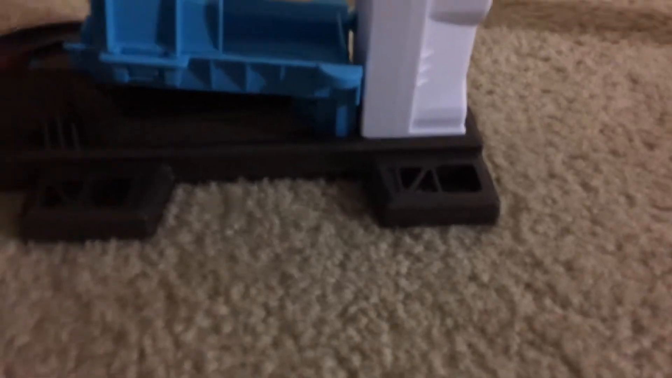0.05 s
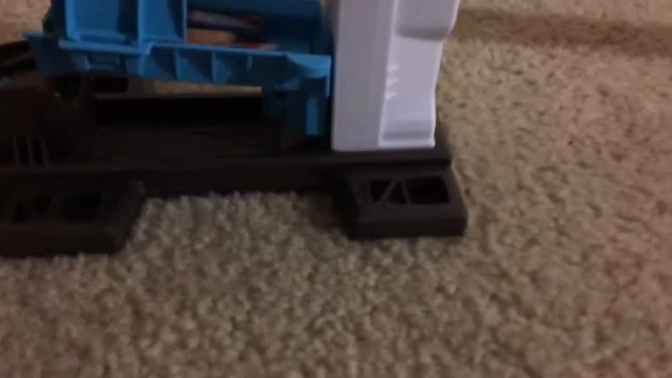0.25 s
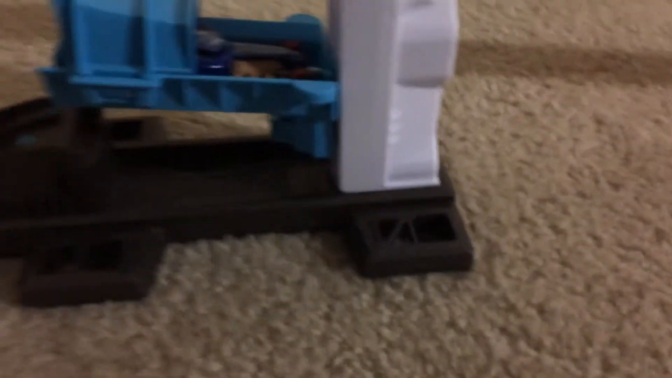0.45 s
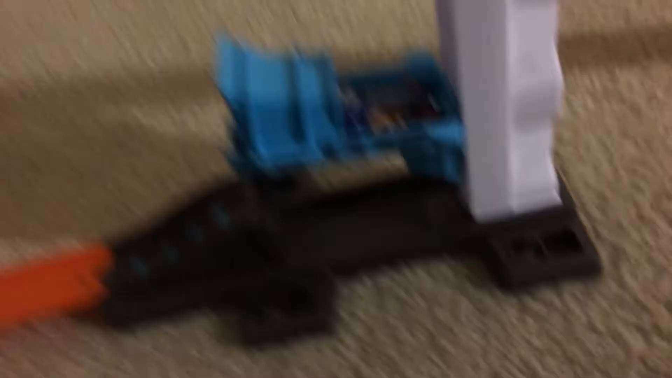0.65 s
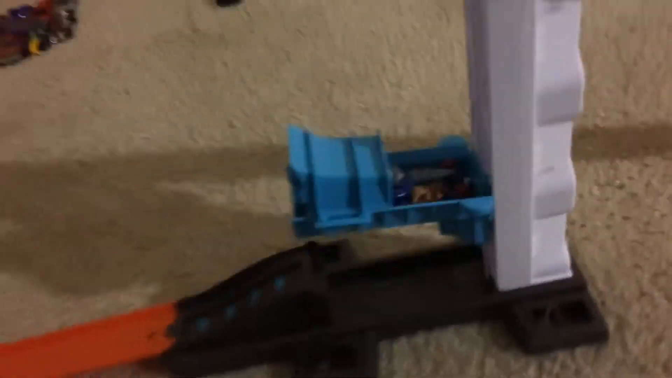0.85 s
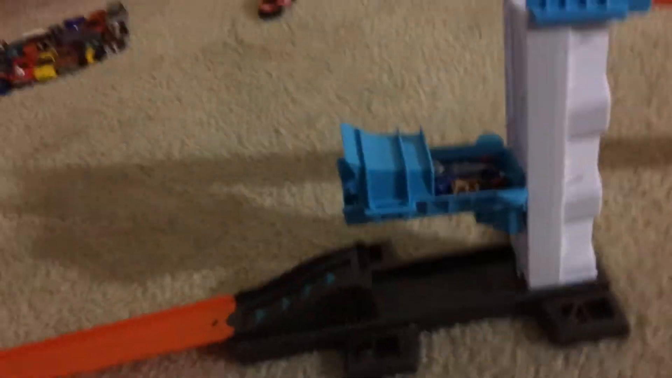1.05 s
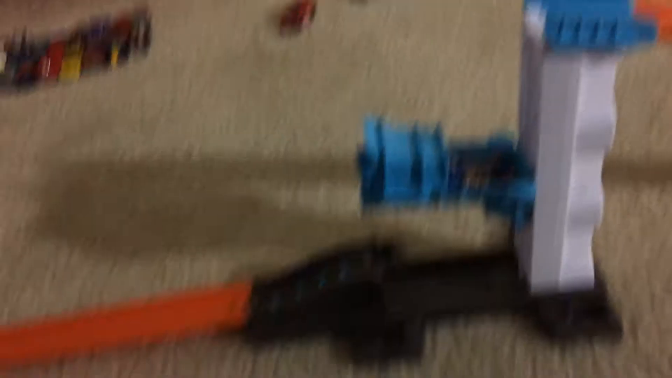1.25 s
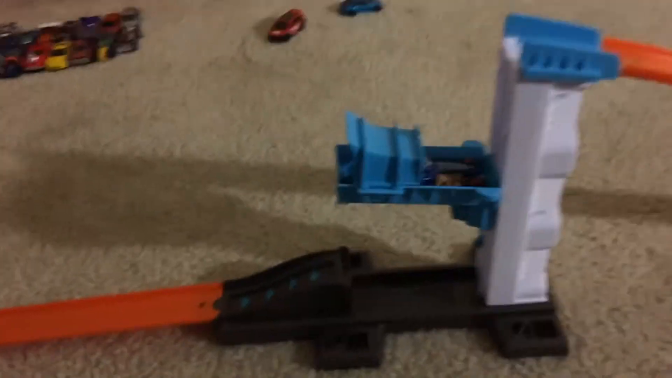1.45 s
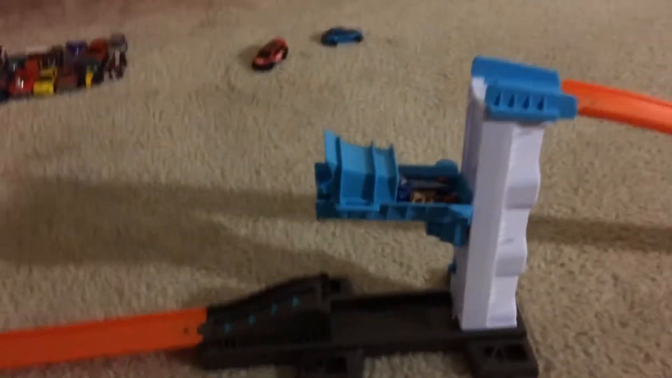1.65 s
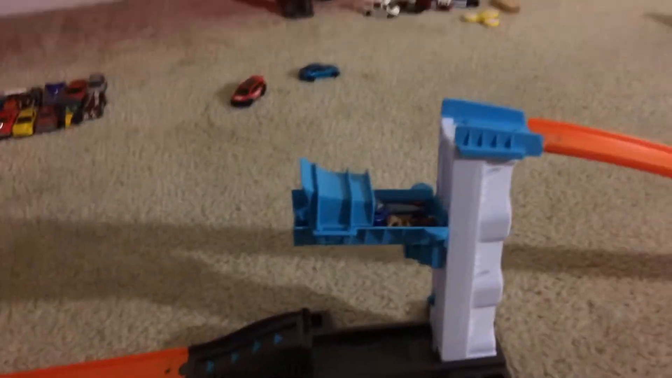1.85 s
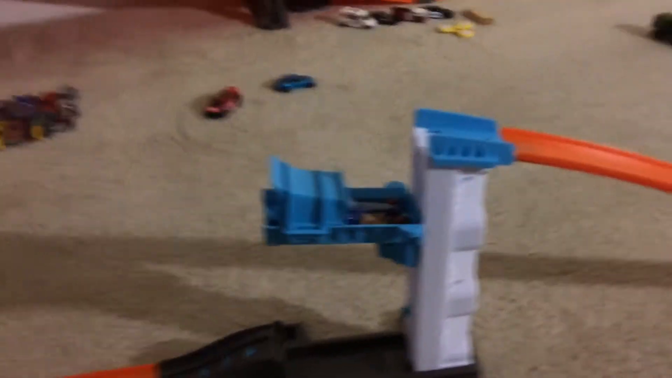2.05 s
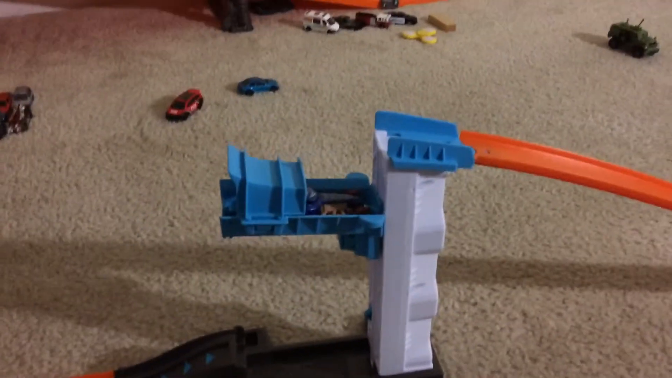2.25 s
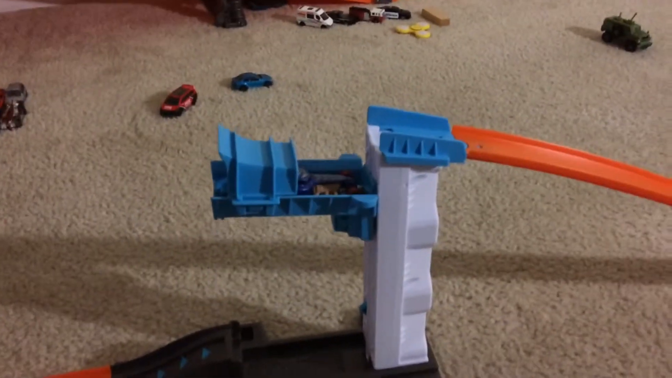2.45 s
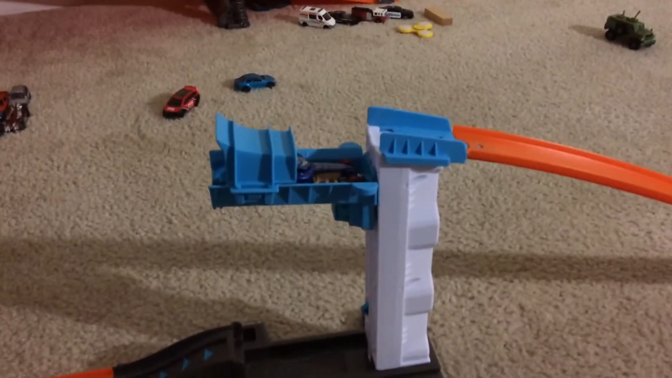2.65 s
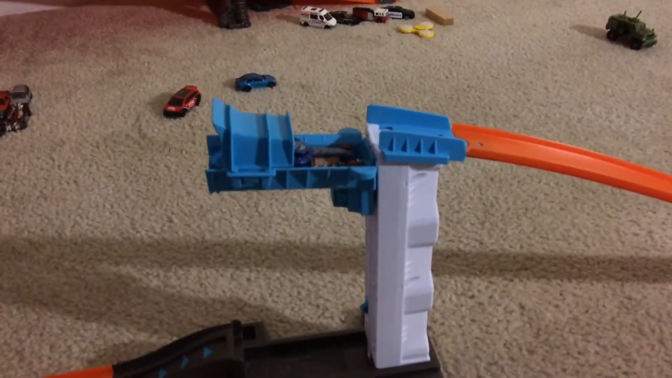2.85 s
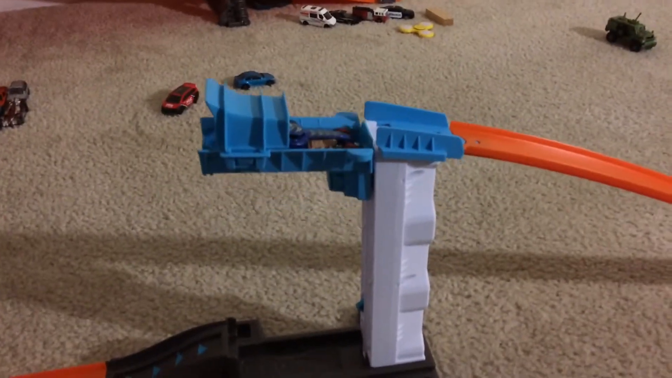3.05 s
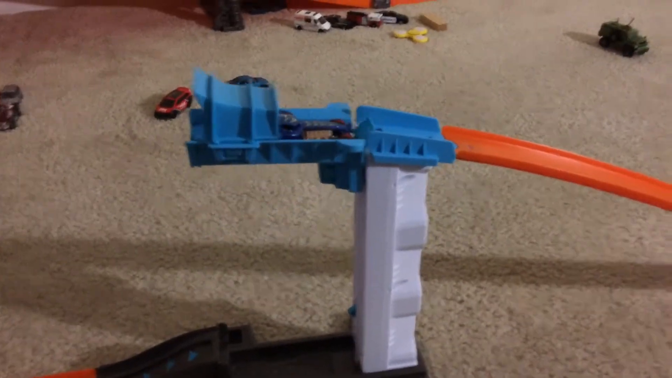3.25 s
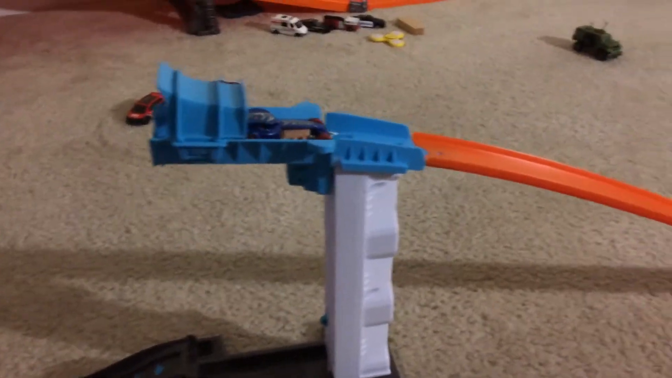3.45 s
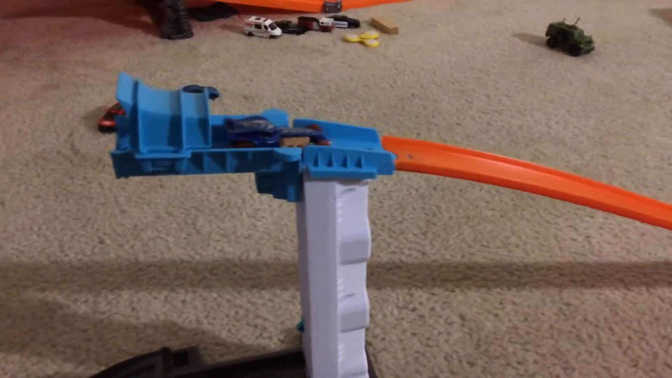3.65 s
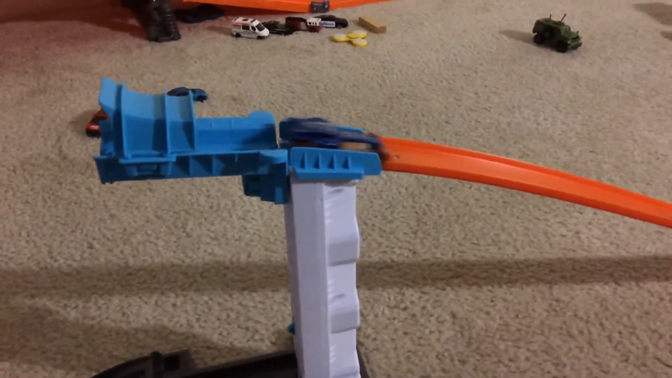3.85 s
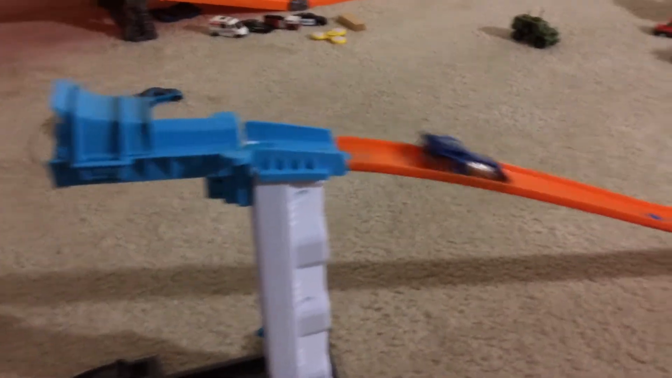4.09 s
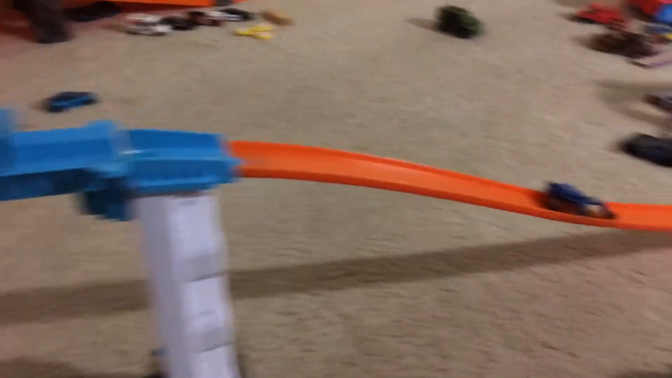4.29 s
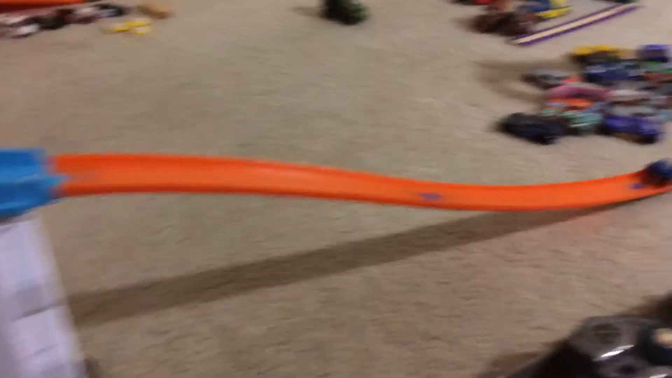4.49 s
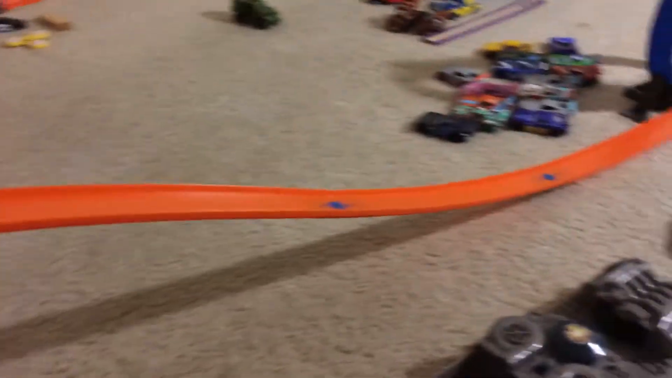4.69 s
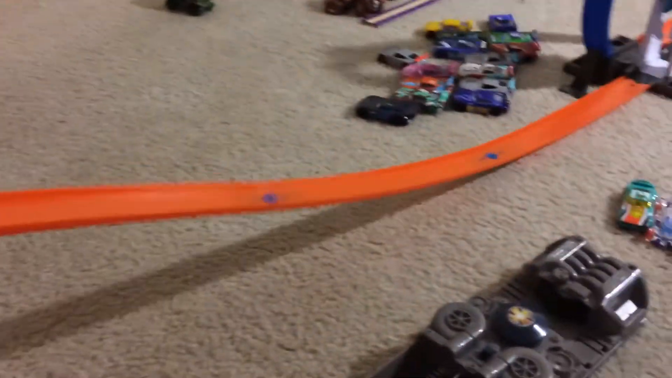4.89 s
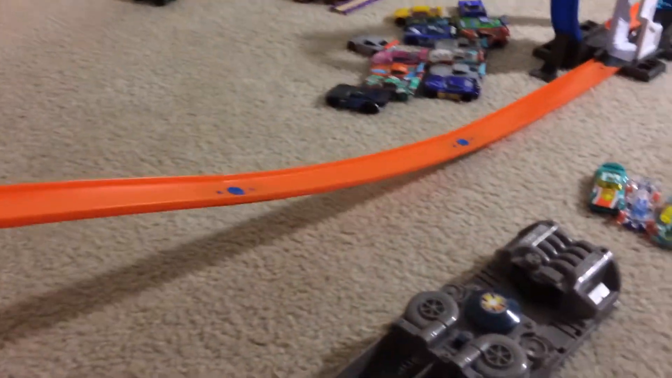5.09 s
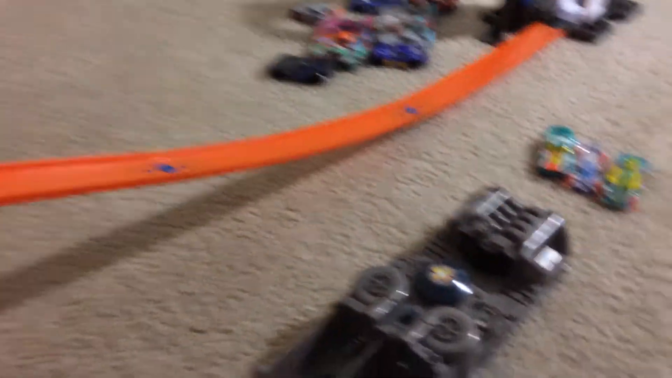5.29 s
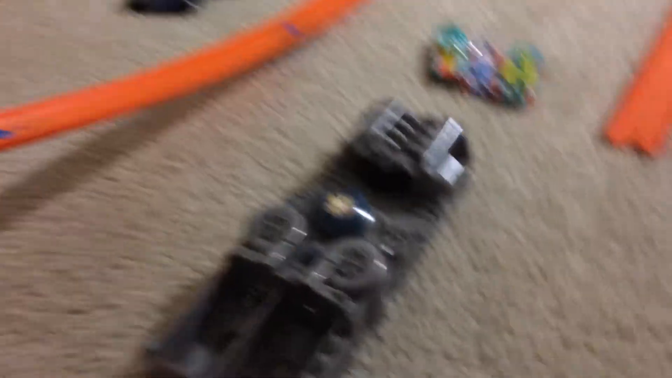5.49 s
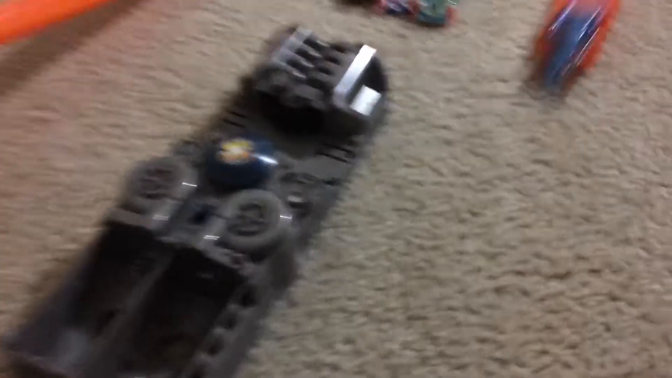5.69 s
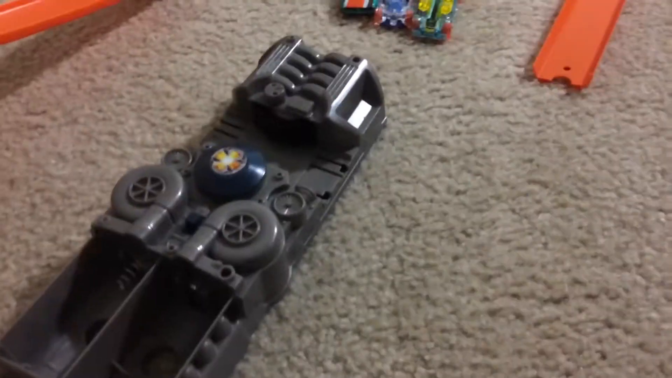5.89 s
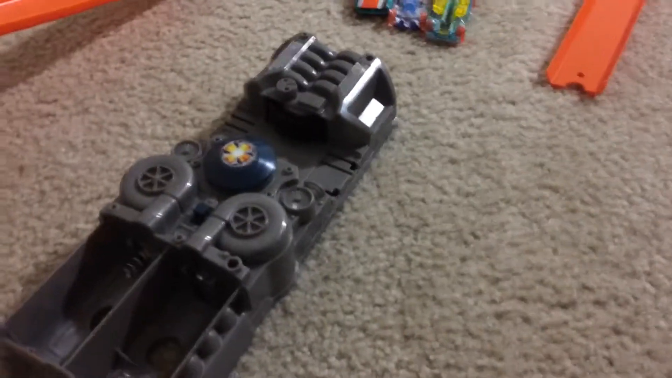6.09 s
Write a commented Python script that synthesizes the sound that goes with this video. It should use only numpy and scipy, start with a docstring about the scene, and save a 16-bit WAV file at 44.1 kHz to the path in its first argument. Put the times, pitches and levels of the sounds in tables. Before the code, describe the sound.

Close up in a carpeted room, small wheels rumble and knock on hollow plastic, and a spring-driven lift trips with a dense clatter. Its thin, bright gear whirr runs about three seconds and stops short. A die-cast car clicks out, rolls hissing down plastic track, gets louder, snaps through a booster further off, rattles round bends and returns near the microphone, fading on carpet.

```python
"""Over faint room noise, wheels rumble on a hollow base and knock; then a spring-driven toy lift trips,
clattering, and whirrs up its tower: struck modes ring, and dense gear contacts excite a housing.
The whirr stops; a die-cast car tips out and rolls down the track as random bumps ringing walls and chassis.
It sets off a snapping booster, rattles round far curves and coasts back close by in a carpeted room."""
import sys
import numpy as np
from scipy import signal
from scipy.fft import rfft, irfft
from scipy.io import wavfile

SR = 44100
rng = np.random.default_rng(int(sys.argv[2]) if len(sys.argv) > 2 else 0)


def inscribe(sig):
    """Save sig as 16-bit PCM at rate SR to the path in sys.argv[1].

    A 1-D sig is mono; a 2-D sig holds one channel per row.
    Samples are clipped to [-1, 1] before scaling.
    """
    pcm = np.round(np.clip(np.atleast_2d(sig).T, -1, 1) * 32767)
    wavfile.write(sys.argv[1], SR, pcm.astype(np.int16))


N = 270244
TIME = np.arange(N) / SR   # s

# spectrum of knocks of the car and rattle of its axles: f/Hz, relative density level/dB
TICK_COLOUR = [(150, -29), (250, -16), (746, -25), (903, 0), (1690, 4.5), (2470, 6.5), (3810, 10),
               (6410, -4.5), (8910, -11.5), (10400, -13), (15800, -25)]


def from_db(db):
    """Level to amplitude: 20 dB is a factor of ten."""
    return np.exp(np.asarray(db) * (np.log(10) / 20))


def rms_one(x):
    """Normalization to unit effective value."""
    return x / np.sqrt(np.mean(x ** 2) + 1e-20)


def in_time(rows):
    """Linear interpolation of each column of a curve at every sample."""
    s, *columns = np.transpose(rows)
    return [np.interp(TIME, s, c) for c in columns]


def at_hz(points, hz):
    """Interpolation on a logarithmic frequency axis."""
    table_hz, values = np.array(points).T
    return np.interp(np.log(hz + 1), np.log(table_hz), values)


def band(x, low_hz, high_hz, order=3):
    """Butterworth band-pass: a maximally flat passband."""
    edges_hz = [low_hz, min(high_hz, SR / 2 - 500)]
    return signal.sosfilt(signal.butter(order, edges_hz, "band", fs=SR, output="sos"), x + 1e-18)


def drift(rate):
    """Slow random modulation: Gaussian knots, rate per second, joined by straight lines."""
    knots = rng.standard_normal(2000)
    return np.interp(TIME * rate, np.arange(len(knots)), knots)


def ramp(start_s, length_s):
    """Linear envelope: an even rise from 0 to 1."""
    return np.clip((TIME - start_s) / max(length_s, 1 / SR), 0, 1)


def hump(middle_s, length_s):
    """Sine-squared envelope: a smooth swell from 0 to 1 and back."""
    return np.sin(np.pi * ramp(middle_s - length_s / 2, length_s)) ** 2


def swell(top_s, rise_s, fall_s):
    """Asymmetric sine-squared envelope: separate rise and fall times."""
    return np.sin(np.pi / 2 * (ramp(top_s - rise_s, rise_s) + ramp(top_s, fall_s))) ** 2


def dying(start_s, t60):
    """Exponential decay: holds at 1, then falls 60 dB in t60 seconds."""
    return from_db(-60 * np.maximum(TIME - start_s, 0) / t60)


def colour(x, spectrum, size=4096):
    """Minimum-phase filtering: a causal response with the given spectrum shape and unit power gain."""
    hz = np.arange(size // 2 + 1) * SR / size
    cepstrum = irfft(np.log(from_db(at_hz(spectrum, hz))))
    # folding the cepstrum onto positive time makes the response causal
    cepstrum[1:size // 2] *= 2
    cepstrum[size // 2 + 1:] = 0
    response = irfft(np.exp(rfft(cepstrum)))
    return signal.oaconvolve(x, response / np.linalg.norm(response))[:len(x)]


def resonance(x, hz, width_hz):
    """Damped oscillator: a two-pole resonance with gain 1 on top."""
    r = np.exp(-np.pi * width_hz / SR)
    numerator = np.array([1, 0, -1]) * (1 - r * r) / 2
    denominator = [1, -2 * r * np.cos(2 * np.pi * hz / SR), r * r]
    return signal.lfilter(numerator, denominator, x)


def contacts(per_s, spread_db):
    """Random impact process: independent tiny impacts of uneven size and either sign."""
    size_db = spread_db * np.minimum(rng.exponential(1, N), 4)
    sizes = from_db(size_db) * rng.choice([-1, 1], N)
    return rms_one(sizes * (rng.random(N) < per_s / SR))


def shaken(strength, hz, width_hz):
    """Randomly driven narrow resonance: a carrier in two quadratures, each modulated by slow noise."""
    out, on = np.zeros(N), strength > 0
    noise = rng.standard_normal((2, N), dtype=np.float32)[:, on]
    wobble = signal.sosfilt(signal.butter(2, width_hz / 2, fs=SR, output="sos"), noise)
    pitch_hz = np.broadcast_to(hz, N)   # may move
    phase = 2 * np.pi * np.cumsum(pitch_hz[on]) / SR
    out[on] = strength[on] * rms_one(wobble[0] * np.cos(phase) + wobble[1] * np.sin(phase))
    return out


def rattle(per_s, t60, spectrum):
    """Repeated impact of loose parts: each random touch is a short decaying burst of noise."""
    touches = np.abs(contacts(per_s, spread_db=8.0)) + 1e-18
    envelope = signal.lfilter([1], [1, -from_db(-60 / (t60 * SR))], touches)
    return rms_one(colour(envelope * rng.standard_normal(N), spectrum))


def knocks(rows, spectrum, crack_db, yield_s, size=8192):
    """Modal response to a blow: a brief crack, then a crowd of fast-dying modes coloured by the place hit."""
    out, t = np.zeros(N + size), TIME[:size]
    bands_hz = (40, 1500), (1500, 7000), (7000, 17000)
    for s, level_db, bass_db, treble_db, t60 in rows:
        ring = colour(rng.standard_normal(2 * size), spectrum)
        bass, body, treble = [rms_one(band(ring, *edges)[size:]) for edges in bands_hz]
        tail = from_db(level_db - 60 * t / max(t60, .003))
        crack = from_db(level_db + crack_db - 60 * t / 0.0036)
        blow = from_db(bass_db) * bass * tail
        blow += (body + from_db(treble_db) * treble) * (tail + crack)
        at = max(round(s * SR), 0)
        out[at:at + size] += blow * (1 - np.exp(-t / yield_s))   # soft plastic yields for an instant
    return out[:N]


def room(x, wet_db):
    """Diffuse reverberation: reflections build up within milliseconds and decay at a rate set by frequency."""
    # reverberation time of the room: f/Hz, t60/s
    room_t60 = [(150, 0.54), (530, 0.19), (1400, 0.43), (3700, 0.39), (9700, 0.35), (15000, 0.27)]
    t, tail = TIME[:SR * 3 // 4], 0
    edges = np.geomspace(60, 17000, 9)   # Hz
    for low, high in zip(edges, edges[1:]):
        decay = from_db(-60 * t / at_hz(room_t60, np.sqrt(low * high)))
        tail = tail + band(rng.standard_normal(len(t)), low, high) * decay
    tail = tail * (1 - np.exp(-(t / 0.0036) ** 2))
    return x + from_db(wet_db) * signal.oaconvolve(x, tail / np.linalg.norm(tail))[:N]


def background():
    """Stationary noise: a broad floor and a low hum, both filtered random noise."""
    # spectrum of the floor: f/Hz, relative density level/dB
    floor_colour = [(25, 0.5), (154, 18), (709, -23), (978, 0.5), (1910, -9), (2070, 7.5), (3830, 7),
                    (5420, -27), (10000, -28), (12400, -26), (15000, -63)]
    # spectrum of the low hum: f/Hz, relative density level/dB
    hum_colour = [(22, -24), (36, -6), (64, 6), (86, 4.5), (119, -6), (149, 4), (173, -4), (414, -8.5),
                  (810, -12), (1360, -120)]
    floor = from_db(-61.5) * colour(rng.standard_normal(N), floor_colour)
    return floor + from_db(-62) * colour(rng.standard_normal(N), hum_colour)


def wheels():
    """Roughness excitation: bumps ring thin track walls and the chassis, louder with speed and in bends."""
    # speed of the car: t/s, ratio to its speed at the foot of the ramp
    speed_curve = [(3.66, 0.16), (3.82, 0.075), (4.47, 0.76), (4.75, 1.02), (4.85, 1.17), (5.45, 1.78),
                   (5.55, 0.6), (5.77, 0.75), (5.85, 0.15), (5.94, 0.17), (6.12, 0.053)]
    # spectrum of rolling: f/Hz, relative density level/dB
    roll_colour = [(110, -18), (160, -3), (250, -12), (450, -7), (700, -11), (950, -8), (1600, -3),
                   (2900, 1.5), (4050, 2), (4600, -2.5), (7000, -8), (12600, -18.5), (15800, -31)]
    # track and chassis resonances: f/Hz, width/Hz, relative level/dB
    track_modes = [(880, 28, -19), (1404, 300, -27), (1920, 180, -9), (5800, 220, -6)]
    # chassis modes ringing at the run-out: f/Hz, width/Hz, relative level/dB
    chassis_modes = [(2500, 160, -3), (3850, 600, -1), (8950, 450, -5)]
    # the car rubs the hollow side walls: strongest t/s, length/s, f/Hz, width/Hz, relative level/dB
    scrapes = [(5.05, .22, 998, 260, -10.5), (5.225, .08, 2050, 600, -2), (5.57, 0.35, 2110, 260, -5.5),
               (5.76, .16, 2600, 900, -3.5)]
    # bends press the wheels down and make the track sing:
    # strongest t/s, rise/s, fall/s, extra level/dB, f/Hz, width/Hz, relative resonance level/dB
    bends = [(4.49, .22, 0.36, 1.5, 3350, 900, -1), (5.091, .09, 0.063, 6, 2390, 1480, -1),
             (5.275, 0.0551, 0.19, 4, 2850, 800, 2.5)]

    speed, = in_time(speed_curve)
    released = TIME > speed_curve[0][0]   # until then the car rests in the lift
    near = ramp(5.01, 0.27)   # the car turns back towards the listener
    run_out = ramp(5.8, 0.097)   # the track ends; wheels and chassis ring on
    hollow_db = -5 * ramp(4.26, 0.44)   # the raised, hollow ramp comes down to the carpet
    bass_far_db, bass_near_db, treble_far_db, treble_near_db = -20.5, -14.5, -3.5, 2
    entry_bass_db = 10.5   # the hollow base under the car before release
    bass_db = entry_bass_db * ~released + bass_far_db + (bass_near_db - bass_far_db) * near
    treble_db = treble_far_db + (treble_near_db - treble_far_db) * near

    bumps = contacts(per_s=1600, spread_db=2.0) * from_db(1.7 * drift(rate=140))
    rung = bumps
    for hz, width_hz, mode_db in track_modes:
        rung = rung + from_db(mode_db - 9.0) * resonance(bumps, hz, width_hz)
    rung = room(colour(rung, roll_colour), wet_db=-6.5)
    flex_db = 2.0 * drift(rate=34)   # the track bows under the car and knocks unevenly in its low range
    sound = from_db(2.0) * rms_one(band(rung, 1433, 5330))
    sound += from_db(hollow_db + flex_db) * rms_one(band(rung, 774, 1814))
    sound += from_db(bass_db + flex_db) * rms_one(band(rung, 85, 920))
    sound += from_db(treble_db) * rms_one(band(rung, 4400, 15700))

    for hz, width_hz, mode_db in chassis_modes:
        sound += shaken(run_out * from_db(mode_db + 2.5 * drift(rate=25)), hz, width_hz)
    # the wheels brush the carpet unevenly
    sound += run_out * from_db(-2.5 + 3.3 * drift(rate=47)) * rms_one(band(bumps, 3800, 9200))
    for s, length_s, hz, width_hz, scrape_db in scrapes:
        sound += shaken(from_db(scrape_db) * hump(s, length_s), hz, width_hz)
    grain_db = np.tanh(drift(rate=240))   # the wheels chatter in the bends, within 1 dB
    for s, rise_s, fall_s, extra_db, hz, width_hz, ring_db in bends:
        load = swell(s, rise_s, fall_s)
        singing = shaken(load * from_db(ring_db), hz, width_hz)
        sound = (sound + singing) * from_db((extra_db + grain_db) * load)

    # the car first rolls over the hollow base into the lift
    entry = from_db(-29) * swell(0.069, rise_s=0.1, fall_s=0.012)
    rolling = released * speed * from_db(-37.5)   # amplitude in proportion to speed
    # play in the axles
    axles = from_db(-52) * np.sqrt(np.abs(speed)) * rattle(per_s=290, t60=0.011, spectrum=TICK_COLOUR)
    return sound * (entry + rolling) + released * axles


def car_knocks():
    """Impact of rigid bodies: the car knocks on the carriage and over track joints."""
    # knocks: t/s, relative level/dB, bass/dB, treble/dB, t60/s
    ticks = [(0.054, -21.5, -2, -11, 0.056), (0.0685, -16, -12, -5, 0.034),
             (3.646, -31.5, -6.5, 1.5, 0.048), (3.658, -35, -3.5, -2, 0.015),
             (3.824, -36, -5.5, -14, 0.019), (3.833, -41, 2.5, -20, 0.055), (3.8872, -25.5, -22, -2, 0.01),
             (3.9035, -24.5, -16, -4, 0.023), (3.9073, -12, -11, -5, 0.0091), (3.929, -28, -20, -10, .012),
             (3.946, -24, -20, -7, .012), (3.9615, -20.5, -20, -6, 0.019), (3.986, -26, -16, -16, 0.018),
             (4.048, -34.5, -22, 1, 0.036), (4.0702, -23.5, -3.5, -11, 0.019), (4.074, -28, -4, -12, 0.014),
             (4.1033, -25.5, -7.5, -9, 0.019), (4.111, -28, -14, -11, 0.01), (5.0205, -17, -11, 4, 0.012),
             (5.09, -16, 0, -14, 0.017), (5.194, -22.5, -19, 2, 0.019), (5.2155, -18, -20, 3, .014),
             (5.2592, -12.5, -31, 1, 0.011), (5.298, -13, -26, -3, .011), (5.3832, -12, -28, -4, 0.0086),
             (5.472, -24.5, -23, 6, 0.022), (5.6022, -26.5, -20, 5, 0.011), (5.628, -21.5, -28, 1.5, 0.019),
             (5.878, -30.5, -32, 2, 0.019), (5.94, -34.5, -30, 2.5, 0.021)]
    return room(from_db(-2.5) * knocks(ticks, TICK_COLOUR, crack_db=-16, yield_s=0.00055), wet_db=-9.5)


def latch():
    """Impact excitation: latch, pawl and carriage clack amid a clatter of loose parts and a cavity boom."""
    # latch, pawl and carriage clacks: t/s, relative level/dB, bass/dB, treble/dB, t60/s
    clacks = [(0.0912, -4.5, -16, -1, .009), (0.0975, -13, -4, -9, 0.032), (0.1057, -3.5, -11, -9.5, 0.026),
              (0.1125, -8.5, -11, -11.5, 0.013), (0.1206, -9, 0.5, -5, 0.016), (0.1232, -5, -1.5, 3, 0.019),
              (0.1368, -3, -9, -6, 0.025), (0.1455, -8, -5, 8, 0.0078), (0.154, -6.5, 8, -5, 0.0093),
              (0.1585, -5, -5, -7, 0.023), (0.163, -13.5, 2.5, -1.5, 0.015), (0.170, -8, -0.5, -3, 0.014),
              (0.1835, -7, -11.5, 1, 0.0081), (0.2098, -4, -29, -10, 0.013), (0.2175, -7, -8, -3, 0.023),
              (0.229, -16, -23, -9, 0.0087), (0.2794, -9.5, -11, -2, 0.016),
              (0.3635, -9.5, -13, 0.5, 0.021), (0.3665, -4.5, -39, 2.5, 0.011)]
    # spectrum of clacks and clatter: f/Hz, relative density level/dB
    clack_colour = [(45, -19), (140, -10.5), (270, -20.5), (370, -1.5), (520, -8), (750, -8.5), (1000, 0),
                    (1700, 6), (3400, 10), (5500, 7), (12700, 3), (15800, -16)]
    clatter = from_db(-21) * hump(0.162, 0.076) * rattle(per_s=240, t60=.012, spectrum=clack_colour)
    # the hollow tower booms under the clatter
    boom = shaken(from_db(-19.5) * hump(.165, 0.054), hz=963, width_hz=280)
    blows = from_db(-1) * knocks(clacks, clack_colour, crack_db=-12.0, yield_s=0.0004)
    return room(blows + clatter + boom, wet_db=-10.0)


def thuds():
    """Free vibration: hollow bodies answer blows with one damped mode each, and a low rumble sounds at 3.41 s."""
    # bodies set ringing by the hardest blows and bumps, and a low rumble at 3.41 s: t/s, relative level/dB,
    # f/Hz, t60/s
    thud_rows = [(0.103, -12, 177, 0.035), (0.122, -22, 80, 0.091), (0.139, -24, 140, 0.045),
                 (.163, -20.5, 352, 0.046), (.167, -16, 967, .045), (0.279, -10.5, 2900, 0.023),
                 (.291, -11.5, 2940, 0.027), (0.3625, -4, 1170, 0.025), (0.3645, -6, 960, 0.021),
                 (0.365, -1.5, 1370, 0.013), (3.659, -24.5, 2040, 0.016), (3.413, -47, 103.7, 0.29),
                 (3.965, -31.5, 1615, 0.071), (3.986, -30, 3820, 0.027), (4.78, -23, 137, 0.036),
                 (5.147, -35.5, 430, 0.056), (5.194, -35, 612, 0.069), (5.216, -32, 560, 0.055),
                 (5.473, -36, 545, 0.072)]
    out, t = np.zeros(N), TIME[:SR // 3]
    for s, level_db, hz, t60 in thud_rows:
        at = round(s * SR)
        envelope = from_db(level_db - 60 * t / t60) * (1 - np.exp(-.8 * t * hz))
        out[at:at + len(t)] += envelope * np.sin(2 * np.pi * hz * t)
    return room(out, wet_db=-13)


LIFT_START_S, LIFT_STOP_S = 0.12, 3.438


def moving_paths(x, count=12):
    """Multipath interference: paths from many housing faces lengthen, so bands wander and glide down."""
    share, stretch_per_s = .18, .06   # strength of each path, and its fractional lengthening per second
    lags_s = rng.uniform(.0005, .0034, count)
    oversampling = 4   # allows fine delay steps
    fine, index = signal.resample_poly(x, oversampling, 1), np.arange(N) * oversampling
    out = x
    for lag_s in lags_s:
        lag = (lag_s * (1 + stretch_per_s * TIME) * SR * oversampling).astype(int)
        out = out + share * drift(rate=10) * fine[index - lag]
    return out


def moving_high_pass(x, edge_hz, size=2048):
    """Radiation cutoff: a steep high-pass whose edge follows a curve block by block."""
    out, state = np.zeros(N), np.zeros((5, 2))
    for i in range(0, N, size):
        sos = signal.butter(10, edge_hz[i], "high", fs=SR, output="sos")
        out[i:i + size], state = signal.sosfilt(sos, x[i:i + size], zi=state)
    return out


def housing(edge_hz):
    """Modal resonance: some housing modes grow or fade with height, others swell in passing and glide."""
    # modes that ring all through the climb: f/Hz, width/Hz, relative level at mid climb/dB, growth/(dB/s)
    steady_modes = [(1471, 120, -25.5, 4.5), (2950, 320, -31, 12), (7320, 1200, -21, -0.5),
                    (10290, 2200, -7.5, 0), (13900, 1550, -11.5, 0)]
    # the housing sings out as it passes places on the tower:
    # strongest t/s, length/s, f/Hz, glide/(Hz/s), width/Hz, relative level/dB
    passing_modes = [(0.45, 0.8, 1660, -100, 300, -12.5), (0.293, 0.38, 9020, -500, 520, -1),
                     (0.52, .3, 8980, 4, 620, -4), (0.597, 0.5, 6240, 304, 500, -7.5),
                     (.62, 0.6, 2443, 199, 200, -11.5), (.6, 0.7, 4150, -1.5, 180, -6),
                     (0.84, .75, 3950, -800, 350, -6.5), (0.84, .4, 10150, 1215, 660, -8),
                     (0.8, .35, 7280, -300, 350, -12), (1.099, 0.75, 2700, 201.5, 350, -10.5),
                     (1.1, .7, 5880, 699, 340, -14), (1.28, .42, 9250, -300, 190, -9.5),
                     (1.465, .55, 10080, -5, 290, -7.5), (1.481, 0.27, 8130, 388, 450, -5.5),
                     (1.67, .8, 891, 0, 137, -16), (2.02, .7, 3560, -900, 360, -9),
                     (1.85, 1.1, 6300, -300, 370, -10), (2.33, .5, 3850, -300, 160, -11),
                     (2.333, 0.702, 6080, -450, 300, -4.5), (2.349, 0.704, 8850, -1100, 550, -8),
                     (2.45, 1.5, 3390, -29.5, 120, -13), (2.55, .7, 10340, 5, 430, -10.5),
                     (3.08, .75, 3850, -300, 170, -8), (3.205, 0.6, 2064, -150, 167, -12),
                     (4.5, 0.43, 9300, -200, 350, -9)]
    climb_s = TIME - (LIFT_START_S + LIFT_STOP_S) / 2
    running = 1 - ramp(LIFT_STOP_S, 0.47)
    # the lowest mode, right at the housing's edge
    out = shaken(running * from_db(-24 - 3.5 * climb_s), edge_hz, width_hz=47)
    for hz, width_hz, mode_db, growth in steady_modes:
        # modes up to 140 Hz wide wander within 2 dB; broader ones even out
        wander_db = 2 * min(140 / width_hz, 1) * np.tanh(drift(rate=6.6))
        out += shaken(running * from_db(mode_db + growth * climb_s + wander_db), hz, width_hz)
    for s, length_s, hz, glide, width_hz, swell_db in passing_modes:
        out += shaken(from_db(swell_db) * hump(s, length_s), hz + glide * (TIME - s), width_hz)
    return out


def lift():
    """Gear noise: dense tooth contacts excite a thin housing that radiates little bass."""
    # whirr: t/s, relative level/dB, relative level of the presence band 2-5 kHz/dB
    whirr = [(0.39, -23, -5.5), (0.47, -19.5, -4.5), (0.81, -19, -5), (1.25, -21, -10), (1.45, -21, -6.5),
             (1.57, -22, -6), (2.11, -22.5, -4.5), (2.51, -23, -6.5), (2.95, -23, -2.5),
             (3.42, -23.5, -5.5)]
    # lowest pitch that the whirring housing radiates: t/s, f/Hz
    whirr_edge = [(.2, 832), (.7, 807), (1.3, 773), (1.7, 745), (2.2, 757), (2.8, 820), (3.2, 1000),
                  (3.5, 994)]
    # spectrum of the gear chatter: f/Hz, relative density level/dB
    whirr_colour = [(600, -8), (900, -1), (1200, -2.5), (1550, -.5), (1880, -5.5), (2500, -1.5),
                    (3900, 1.5), (4400, -2.5), (5150, -3.5), (5900, .5), (6700, -2), (7400, 1.5),
                    (8200, -1), (9000, 2), (10400, 1.5), (12000, -3.5), (14000, -2.5), (15800, -7)]
    level_db, presence_db = in_time(whirr)
    edge_hz, = in_time(whirr_edge)
    teeth = moving_paths(colour(contacts(per_s=12000, spread_db=0.0), whirr_colour))
    bands_hz = (500, 2000), (2000, 5000), (5000, 8000), (8000, 19000)
    low, presence, high, treble = [rms_one(band(teeth, *edges)) for edges in bands_hz]
    high_db = -3 + 0.43 * (presence_db - presence_db.mean())   # shares part of the presence band's swing
    treble_db = -4.3 - 3.6 * ramp(2.92, 0.61)   # duller near the top
    sound = from_db(-13.5) * low + from_db(presence_db - 0.5) * presence
    sound += from_db(high_db) * high + from_db(treble_db) * treble
    sound = moving_high_pass(sound + housing(edge_hz), edge_hz)
    # the tower passes on a trace of lower sound
    sound += from_db(-42.5) * rms_one(band(rng.standard_normal(N), 300, 1020))
    # the gears stop short, then spin out faintly
    stopping = np.maximum(dying(LIFT_STOP_S, t60=0.23), from_db(-7.5) * dying(LIFT_STOP_S, t60=0.47))
    running = ramp(LIFT_START_S, 0.039) * stopping
    # the freed spring starts hard and settles
    surge_db = 7 * np.exp(-np.maximum(TIME - LIFT_START_S, 0) / 0.12)
    flutter_db = 0.46 * drift(rate=260) + 0.54 * drift(rate=32)
    return sound * running * from_db(level_db + surge_db + flutter_db)


def booster():
    """Sudden release: the trigger and the arm snap, then the loose plastic parts shudder to rest."""
    # trigger and arm snaps: t/s, relative level/dB, bass/dB, treble/dB, t60/s
    snaps = [(4.7483, -19.5, -15, 3, 0.018), (4.752, -12, -13, -1.5, 0.012), (4.7715, -24.5, 2, -9, 0.016),
             (4.7793, -8, -12.5, 3.5, 0.011), (4.7902, -7.5, -17, -7, 0.011), (4.805, -18.5, -7, 0, .01)]
    # spectrum of snaps and shudder: f/Hz, relative density level/dB
    snap_colour = [(45, -33), (170, -23), (250, -31), (340, -4.5), (480, -6), (800, 2.5), (1400, -1.5),
                   (2300, -3.5), (4200, 0.5), (7000, 0.5), (13000, -3.5), (15800, -28)]
    shudder_s = 4.792
    shudder = from_db(-17.5) * colour(contacts(per_s=3600, spread_db=3.5), snap_colour)
    shudder *= dying(shudder_s, t60=0.24) * (TIME > shudder_s)
    blows = from_db(1.5) * knocks(snaps, snap_colour, crack_db=-0.5, yield_s=0.00029)
    return room(blows + shudder, wet_db=-3)


def scene():
    """Superposition: the lift is close and dry, the track and booster further off in the room."""
    mix = background() + wheels() + car_knocks() + latch() + thuds() + lift() + booster()
    return np.tile(mix, (2, 1))   # two equal channels


def record(dry):
    """Saturation and band limiting: peaks are rounded, the deepest bass and the top are cut."""
    rounded = 1.005 * np.tanh(dry / 1.165)
    rounded = signal.sosfilt(signal.butter(2, 46, "high", fs=SR, output="sos"), rounded)
    cutoff_hz = 15900
    return signal.sosfilt(signal.ellip(12, .1, 100, cutoff_hz, fs=SR, output="sos"), rounded)


dry = scene()
out = record(dry)
inscribe(out)
```